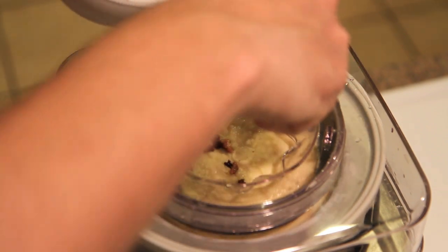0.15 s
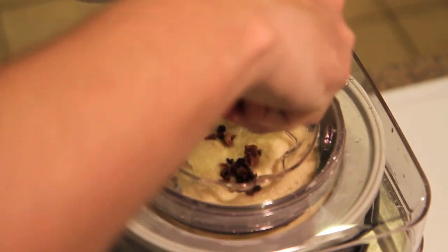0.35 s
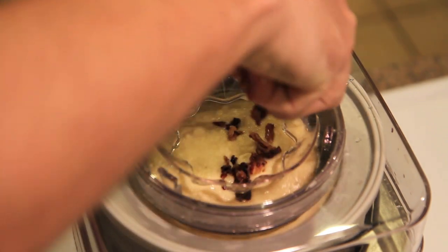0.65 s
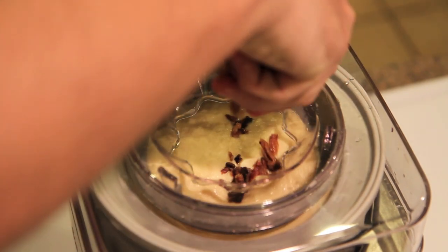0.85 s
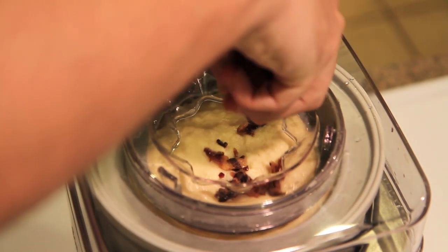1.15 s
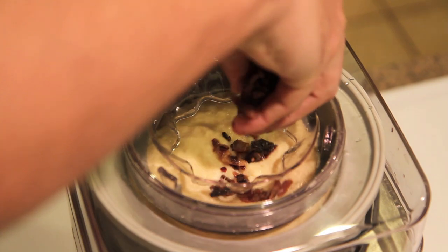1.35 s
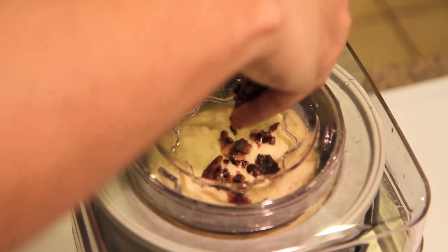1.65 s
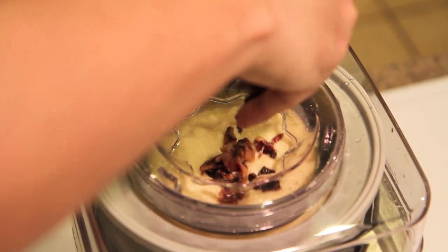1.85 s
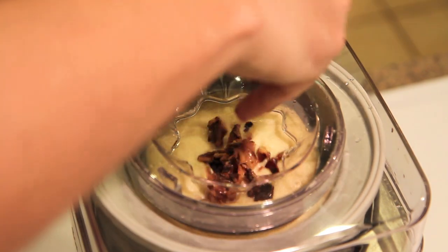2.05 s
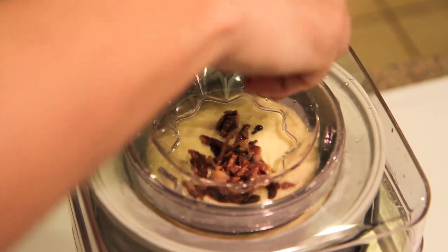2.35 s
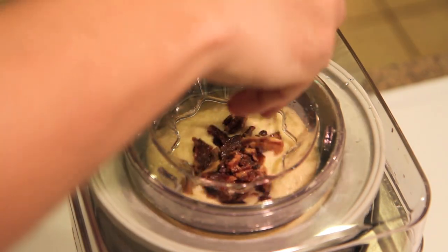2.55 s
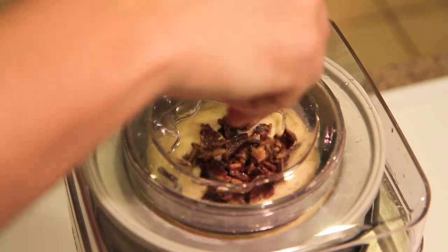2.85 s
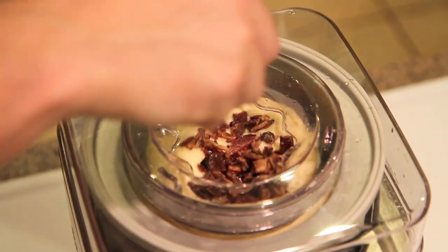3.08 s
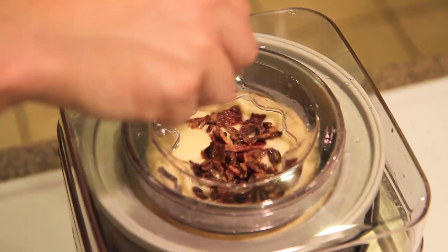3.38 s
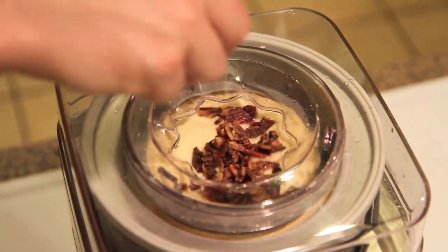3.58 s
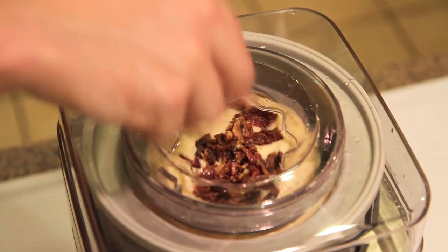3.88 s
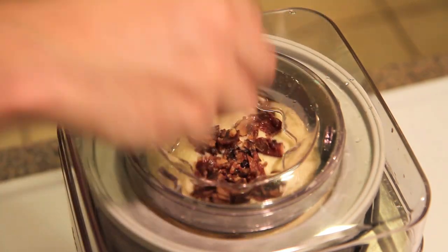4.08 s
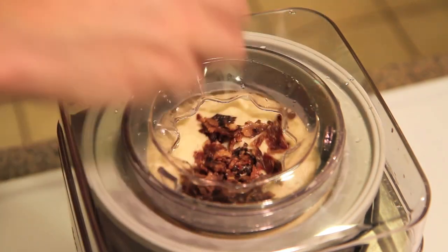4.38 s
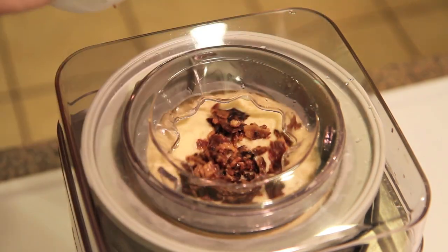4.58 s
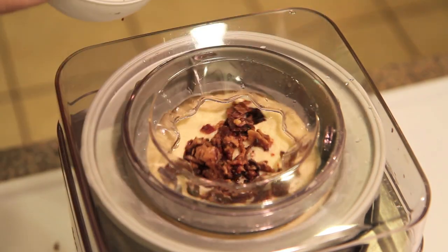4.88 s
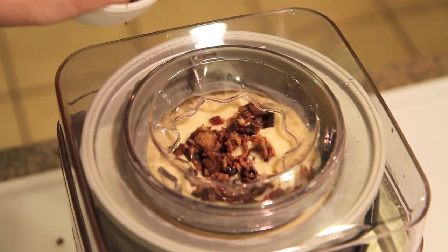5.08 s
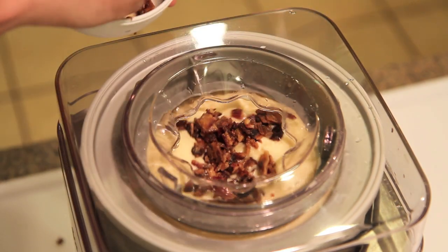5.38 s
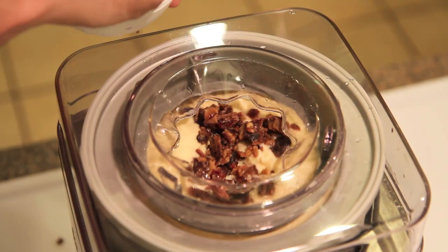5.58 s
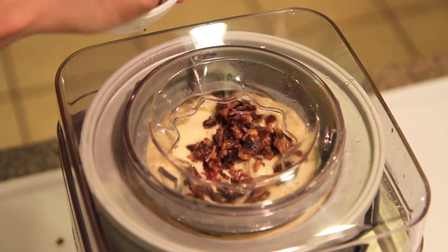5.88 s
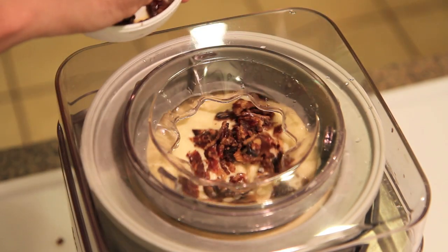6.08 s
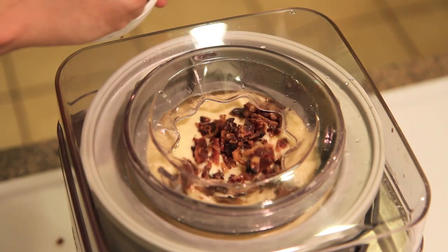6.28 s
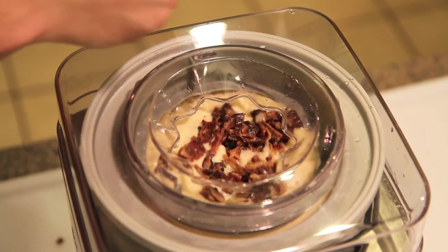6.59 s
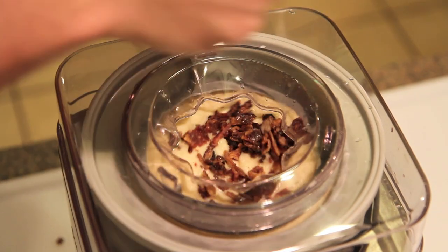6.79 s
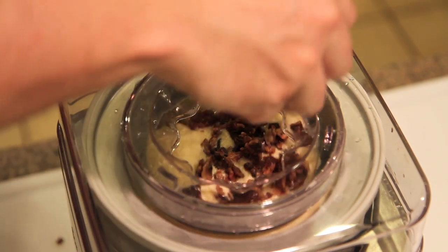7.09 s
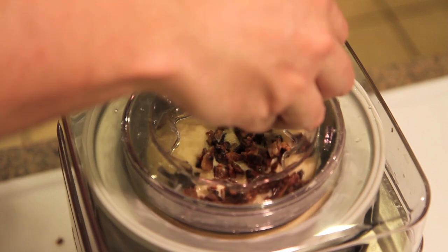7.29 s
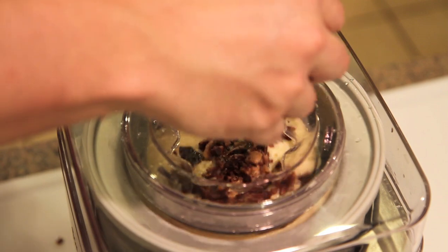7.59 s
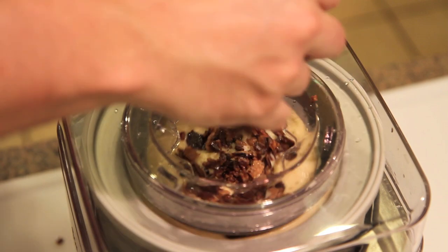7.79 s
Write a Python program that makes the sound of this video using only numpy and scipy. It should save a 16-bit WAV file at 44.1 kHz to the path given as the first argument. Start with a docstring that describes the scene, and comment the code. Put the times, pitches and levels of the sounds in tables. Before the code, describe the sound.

Steady mid-pitched drone of a little kitchen churning machine, rattling and buzzing, its strength swaying slowly over faint sticky squelching and sparse clicks.

```python
"""On a kitchen counter a small ice cream maker churns while chopped bits are dropped in by hand.
Its induction motor drives a gear: shaft harmonics sing as wavering sines, and the mains ripple
puts side tones around them. Random impulses, one a tooth, knock in the housing; noise driven by
the gear's force buzzes the plastic lid. Sparse and dense snaps make the faint squelch of the stiff
mixture, small ticks and one rustle of crumbs."""
import sys
import numpy as np
from scipy import signal
from scipy.fft import rfft, irfft
from scipy.io import wavfile

SR = 44100
rng = np.random.default_rng(int(sys.argv[2]) if len(sys.argv) > 2 else 0)


def int16_out(signal):
    """Quantize to a 16-bit WAV file."""
    q = np.round(np.clip(np.atleast_2d(signal).T, -1, 1) * 32767)
    wavfile.write(sys.argv[1], SR, q.astype(np.int16))


N = 350154
TIME = np.arange(N) / SR  # s
BINS = np.fft.rfftfreq(8192, 1 / SR)  # Hz
PINION_TEETH, WHEEL_TEETH = 7, 59
RIPPLE_HZ = 119.96  # torque ripple of the mains


def amp(db):
    """Decibels to gain."""
    return 10 ** (np.asarray(db) / 20)


def unit(x):
    """Scales to rms 1."""
    return x / np.sqrt(np.mean(x ** 2) + 1e-20)


def follow(rows):
    """The columns of a curve table, sample by sample."""
    start_s, *columns = np.transpose(rows)
    return [np.interp(TIME, start_s, column) for column in columns]


def drift(hz):
    """Slow random sway of rms 1: noise that rolls off above about hz."""
    steps = rng.standard_normal(N // 64 + 2)  # one step every 64 samples
    f = np.fft.rfftfreq(len(steps), 64 / SR)
    slow = irfft(rfft(steps) / np.sqrt(1 + (f / hz) ** 4), len(steps))
    return unit(np.interp(np.arange(N) / 64, np.arange(len(slow)), slow))


def colour(x, points):
    """Passes x through a causal, minimum-phase body of the given spectrum and scales it to rms 1."""
    pitch_hz, level_db = np.transpose(points)
    curve_db = np.interp(np.log(BINS + 1), np.log(pitch_hz), level_db)
    log_gain = np.log(amp(curve_db))
    circle = np.concatenate([log_gain, log_gain[-2:0:-1]])
    response = np.fft.ifft(np.exp(np.conj(signal.hilbert(circle)))).real
    return unit(signal.oaconvolve(x, response[:len(BINS)])[:N])


def ring(x, pitch_hz, width_hz):
    """One decaying mode as a complex one-pole filter; its gain is about 1 at the centre."""
    r = np.exp(-np.pi * width_hz / SR)
    pole = r * np.exp(2j * np.pi * pitch_hz / SR)
    return 2 * signal.lfilter([1 - r], [1, -pole], x).real


def ring_twice(x, pitch_hz, width_hz):
    """A mode with steeper skirts: two equal rings in a row."""
    return ring(ring(x, pitch_hz, width_hz), pitch_hz, width_hz)


def grains(per_s, spread_db):
    """Random one-sample snaps of very unequal size and either sign."""
    size_db = spread_db * np.minimum(rng.exponential(1, N), 4)
    size = amp(size_db) * rng.choice([-1, 1], N)
    return size * (rng.random(N) < per_s / SR)


def tone(shaft, order, ripple, level_db, waver):
    """One shaft harmonic, shifted by a multiple of the mains ripple, wavering in strength."""
    angle = 2 * np.pi * (order * shaft + ripple * RIPPLE_HZ * TIME + rng.random())
    return np.sqrt(2) * amp(level_db) * (1 + waver * drift(7.3)) * np.cos(angle)


def paddle(peak_s, turn_s=2.25):
    """A swing between -1 and 1 with each turn of the paddle."""
    return np.cos(2 * np.pi * (TIME - peak_s) / turn_s)


# the paddle catches on a lump and the gear labours; columns: start_s (middle of the catch),
# swell_db (rise of the mesh), sag_hz (fall of the mesh pitch)
LUMP_CATCHES = [(1.217, 1, 2.5), (3.621, 2, 3.5)]


def gear_load(arm, ease, catch_s=.04):
    """Pitch (Hz) and level (dB) of the mesh: easing load speeds it up, and a lump slows and swells it."""
    mesh_hz = 396.7 + .28 * ease
    mesh_db = -20.5 + 1.7 * arm - 0.26 * ease
    for start_s, swell_db, sag_hz in LUMP_CATCHES:
        strain = np.exp(-((TIME - start_s) / catch_s) ** 2)
        mesh_db = mesh_db + swell_db * strain
        mesh_hz = mesh_hz - sag_hz * strain
    return mesh_hz, mesh_db


def shaft_turns(mesh_hz, wobble_hz=0.5, slip_hz=.35, unsteady_hz=.35):
    """Shaft angle in turns: the eccentric wheel brakes it, and it sways as the rotor slips behind the mains."""
    teeth = np.cumsum(mesh_hz) / SR
    slip = RIPPLE_HZ / 2 * TIME - teeth / PINION_TEETH
    wobble = wobble_hz * np.sin(2 * np.pi * teeth / WHEEL_TEETH)
    sway = slip_hz * np.sin(2 * np.pi * slip)
    hz = mesh_hz + wobble - sway + unsteady_hz * drift(5.6)
    return np.cumsum(hz) / SR / PINION_TEETH


def contact_force(shaft, mesh=0.26, ripple=0.12, once=0.13, lobes=0.093, wheel_once=0.028, uneven_db=0.73):
    """The force on loose parts rises with each tooth, shaft turn, torque pulse and lobe of the wheel."""
    wheel = shaft * PINION_TEETH / WHEEL_TEETH
    tooth_push = mesh * np.cos(2 * np.pi * PINION_TEETH * shaft)
    torque_push = ripple * np.cos(2 * np.pi * RIPPLE_HZ * TIME)
    shaft_push = once * np.cos(2 * np.pi * shaft)
    # three lobes in each turn of the wheel
    wheel_push = lobes * np.cos(6 * np.pi * wheel) + wheel_once * np.cos(2 * np.pi * wheel)
    push = tooth_push + torque_push + shaft_push + wheel_push
    return unit(np.exp(push) * amp(uneven_db * drift(28)))


# the motor's chord of shaft and ripple tones; columns: order (multiple of the shaft speed),
# ripple (multiple of the mains ripple added to it), level_db
MOTOR_CHORD = [(0, 1, -52), (0, 3, -40), (0, 4, -44), (11, -1, -40), (12, -1, -36.5), (8, 1, -39),
               (13, -1, -39), (11, 0, -38), (9, 1, -42), (7, 2, -38), (13, 0, -34.5), (7, 3, -39),
               (6, 4, -41), (15, 0, -32), (18, -1, -42), (21, -2, -40), (18, 0, -41.5), (19, 0, -46),
               (18, 1, -46), (21, 0, -47), (19, 1, -49), (23, 0, -49), (28, 0, -47), (42, -1, -46)]


def motor_tones(shaft, mesh_db, hand, slack, waver=0.26, mesh_waver=0.049, throb=0.019):
    """The mesh throbs with the wheel; its octave grows with the hand, two side tones with the slack."""
    octave_db = -29.2 + 6.5 * hand
    side_db, upper_side_db, side_slack_db = -25.5, -30, 1.3
    wheel = np.sin(2 * np.pi * shaft * PINION_TEETH / WHEEL_TEETH)
    mesh = (1 + throb * wheel) * tone(shaft, PINION_TEETH, 0, mesh_db, mesh_waver)
    octave = tone(shaft, 2 * PINION_TEETH, 0, octave_db, waver)
    below_octave = tone(shaft, 2 * PINION_TEETH, -1, side_db + side_slack_db * slack, waver)
    above_mesh = tone(shaft, PINION_TEETH, 0.99, upper_side_db + side_slack_db * slack, waver)
    chord = sum(tone(shaft, *row, waver) for row in MOTOR_CHORD)
    return mesh + octave + below_octave + above_mesh + chord


def low_hum(shaft):
    """The shaft's unbalance, one sine a turn, beats slowly against a steady second hum."""
    shaft_db, second_db, second_hz = -58.3, -61, 58.56
    unbalance = amp(shaft_db) * np.sin(2 * np.pi * shaft)
    second_hum = amp(second_db) * np.sin(2 * np.pi * second_hz * TIME)
    return np.sqrt(2) * (unbalance - second_hum)


def rim_whine(shaft, hand, waver=0.16):
    """The mesh's eighth harmonic, near the rim's resonance, sings louder as the hand comes down."""
    return tone(shaft, 8 * PINION_TEETH, 0, -45 + 8 * hand, waver)


# colour of the motor housing; columns: pitch_hz, level_db (relative)
HOUSING_COLOUR = [(30, -75), (70, -43), (130, -23), (190, -16), (260, -23.5), (330, -16), (395, -9),
                  (445, -15), (510, -5), (600, -8), (680, 0), (800, -10), (930, -12.5), (1040, -16),
                  (1500, -54.5)]


def tooth_knocks(shaft):
    """One impulse a tooth: its strength departs from the smooth mesh by wear, torque ripple and play."""
    worn, loose, ripple = .5, .8, .45
    teeth = np.floor(shaft * PINION_TEETH).astype(int)
    at = np.flatnonzero(np.diff(teeth))
    tooth = teeth[at] % WHEEL_TEETH
    wear = unit(rng.permutation(np.linspace(-1, 1, WHEEL_TEETH)))
    late = rng.integers(0, 40, WHEEL_TEETH)  # samples, fixed for each tooth
    play = unit(rng.uniform(-1, 1, N))[at]
    torque = 1 + ripple * np.cos(2 * np.pi * RIPPLE_HZ * TIME[at])
    knocks = np.zeros(N)
    knocks[np.minimum(at + late[tooth], N - 1)] = torque * (worn * wear[tooth] + loose * play)
    return colour(knocks, HOUSING_COLOUR)


def bowl(knocks, arm, hollow_hz=900, hollow_width_hz=170, hollow_db=-9):
    """The arm over the opening closes a hollow that the knocks ring."""
    hollow = unit(ring_twice(knocks, hollow_hz, hollow_width_hz))
    return knocks + arm * amp(hollow_db) * hollow


# colour of the buzzing plastic shell; columns: pitch_hz, level_db (relative)
SHELL_COLOUR = [(600, -36), (1100, -11.5), (1400, -6), (1800, -9.5), (2400, -8), (2900, -9), (3600, -9),
                (4600, -12.5), (5050, -16.5), (5500, -22.5), (7000, -29), (9500, -34), (13500, -35.5),
                (15500, -37.5)]
# ringing modes of the lid; columns: pitch_hz, width_hz (half the width of each of two rings in a row),
# level_db (relative, before the arm), arm_db (change with the arm fully over the bowl)
LID_MODES = [(2228, 63, -8, 5.5), (2555, 41, -5.5, -10), (3407, 130, -13, -10), (3803, 81, -8, -1),
             (4010, 37, 2, -6), (4252, 39, -3, -12), (4475, 81, -11.5, -4), (4840, 60, -3, -3),
             (5770, 100, -20, 1.5), (7460, 180, -26, -9), (10350, 170, -23, -3)]


def lid(force, arm, hand, buzz_db=-30, modes_db=-6.5):
    """Noise chatter under the gear's force sounds the shell and rings lid modes that come and go."""
    rim_hz, rim_width_hz, rim_db = 3205, 260, -43.5 + 6 * hand
    shell_db = 0.97 - .6 * (arm - .5)
    chatter = force * rng.standard_normal(N)
    modes = np.zeros(N)
    for pitch_hz, width_hz, level_db, arm_db in LID_MODES:
        gain = amp(level_db + arm * arm_db + 1.6 * drift(2.1))
        modes += gain * ring_twice(chatter, pitch_hz, 2 * width_hz)
    shell = amp(shell_db) * colour(chatter, SHELL_COLOUR)
    rim = unit(ring_twice(chatter, rim_hz, rim_width_hz))
    return amp(buzz_db) * (shell + amp(modes_db) * unit(modes)) + amp(rim_db) * rim


# colour of the wet mixture; columns: pitch_hz, level_db (relative)
CREAM_COLOUR = [(1000, -15), (4000, 0.5), (7500, 4.5), (13000, 2.5), (14500, -6), (15700, -12)]


def mixture(force, arm, squelch_db=-45.5, shade_db=-1.7):
    """Clumps of tiny sticky snaps pulse with the drive's force; a few bubbles pop above them."""
    sticky = unit(grains(per_s=7000, spread_db=2.5) * amp(2.4 * drift(20)))
    pops = .22 * unit(grains(per_s=30, spread_db=1.5))
    return amp(squelch_db + shade_db * arm) * colour(sticky * force + pops, CREAM_COLOUR)


# colour of the ticks; columns: pitch_hz, level_db (relative)
TICK_BRIGHTNESS = [(1500, -12), (5000, -5), (10000, -4), (14000, 0), (15700, 4)]
# small ticks of bits and sticky mixture; columns: start_s, level_db (peak, before the common lift)
TICK_TIMES = [(0.5836, -33), (1.0734, -30), (1.418, -25), (1.5599, -29), (1.7519, -31), (2.2253, -35),
              (2.4024, -31), (2.827, -36), (2.9836, -29), (3.0599, -26), (3.8424, -39), (4.8768, -34),
              (5.0355, -33), (5.462, -31), (5.7942, -30)]


def ticks(lift_db=7, decay_s=0.0027):
    """Small bright snaps: slices of coloured noise that die in a few milliseconds."""
    t = np.arange(SR // 50) / SR
    out = np.zeros(N)
    fizz = colour(rng.standard_normal(N), TICK_BRIGHTNESS)
    for start_s, level_db in TICK_TIMES:
        at = round(start_s * SR)
        snap = fizz[at:at + len(t)] * np.exp(-t / decay_s)
        out[at:at + len(t)] += amp(level_db + lift_db) * snap / abs(snap).max()
    return out


# colour of the crumbs; columns: pitch_hz, level_db (relative)
CRUMB_COLOUR = [(500, -10), (1500, 9), (4000, 0), (7000, -9), (13000, -11), (16000, -18)]
# swell and fade of the short rustle; columns: start_s, level_db
RUSTLE_CURVE = [(3.32, -50), (3.37, -34), (3.405, -33), (3.418, -26.5), (3.445, -31), (3.5, -46)]


def crumbs():
    """Dry bits rubbed off the fingers: dense snaps under a short loudness curve."""
    rubbing = (TIME > RUSTLE_CURVE[0][0]) & (TIME < RUSTLE_CURVE[-1][0])
    level_db = follow(RUSTLE_CURVE)[0]
    return rubbing * amp(level_db) * colour(grains(per_s=6000, spread_db=2.5), CRUMB_COLOUR)


def kitchen(x, t60_s=0.18):
    """A small share of the sound arrives as the short, dense echo of a tiled room: decaying noise."""
    wet = .15  # share of the power
    t = np.arange(SR // 2) / SR
    tail = rng.standard_normal(len(t)) * amp(-60 * t / t60_s) * (t > .003)
    echo = signal.oaconvolve(x, tail / np.linalg.norm(tail))[:N]
    return np.sqrt(1 - wet) * x + np.sqrt(wet) * echo


# the arm that drops the bits in; columns: start_s, arm (over the bowl, 0-1),
# hand (down at the opening, 0-1)
ARM_MOVES = [(0, 1, 0.3), (.5, 1, .2), (1.15, 0.85, 0.9), (2.7, 1, 0.84), (3.25, .5, 0.55),
             (3.75, 0.1, 0.85), (4.9, 0.1, 0), (6.1, 0, 0.3), (6.8, 0.1, 0.06), (7.5, 0.4, 0.4),
             (7.94, 0.4, 0.2)]


def scene():
    """The machine close by, a little kitchen around its clatter; the gears run slack before the load eases."""
    arm, hand = follow(ARM_MOVES)
    ease, slack = paddle(peak_s=2.25), paddle(peak_s=1.85)
    mesh_hz, mesh_db = gear_load(arm, ease)
    shaft = shaft_turns(mesh_hz)
    force = contact_force(shaft)
    tones = motor_tones(shaft, mesh_db, hand, slack) + low_hum(shaft) + rim_whine(shaft, hand)
    knocks = amp(-24 + 0.2 * slack) * unit(bowl(tooth_knocks(shaft), arm))
    clatter = knocks + lid(force, arm, hand) + mixture(force, arm) + ticks() + crumbs()
    return (tones + kitchen(clatter))[None]


def record(dry, edge_hz=15720):
    """A steep linear-phase low-pass closes the top of the band."""
    low_pass = signal.firwin(1023, edge_hz, window=("kaiser", 9), fs=SR)
    return signal.oaconvolve(dry, low_pass[None], "same")


dry = scene()
out = record(dry)
int16_out(out)
```